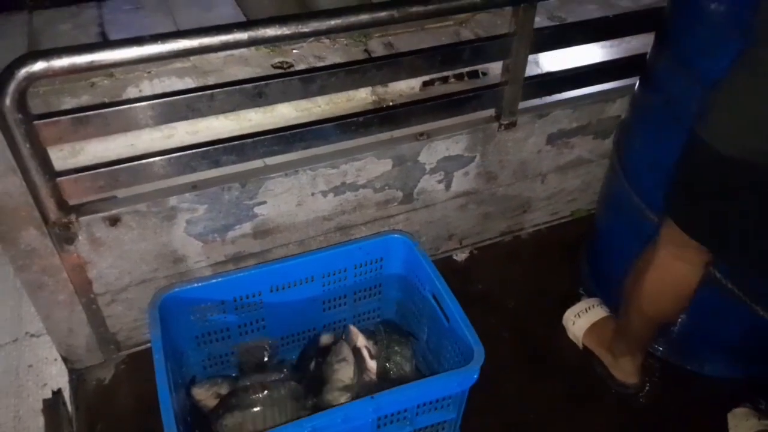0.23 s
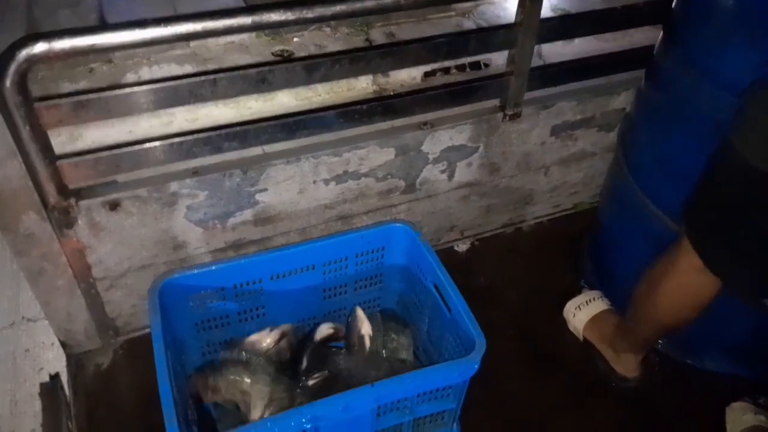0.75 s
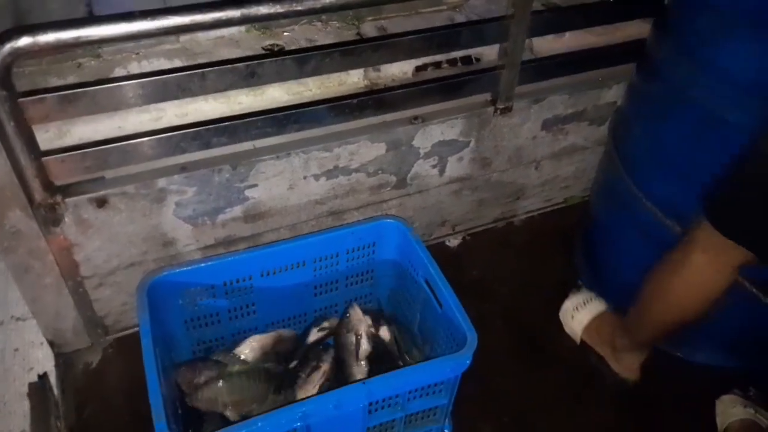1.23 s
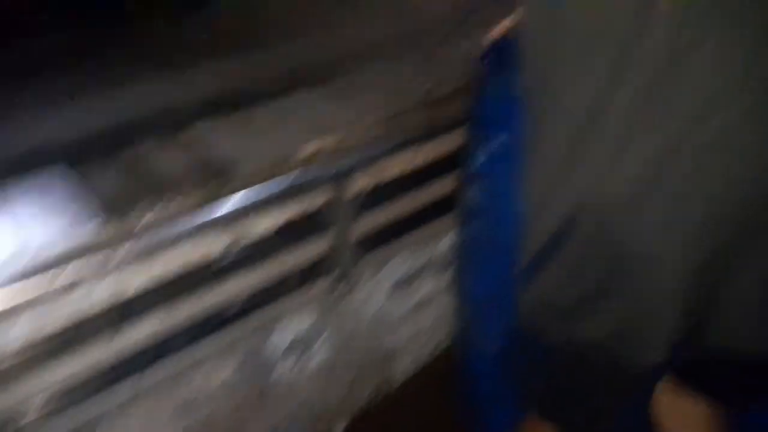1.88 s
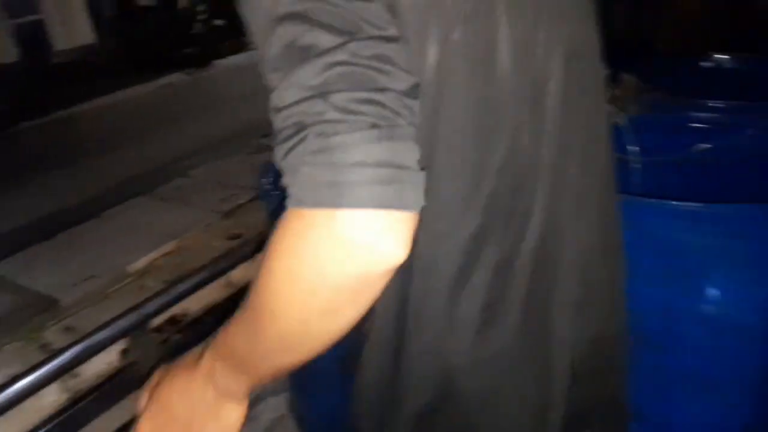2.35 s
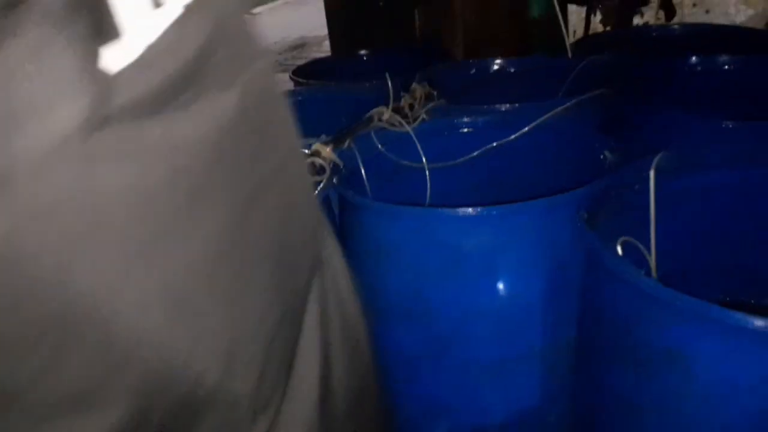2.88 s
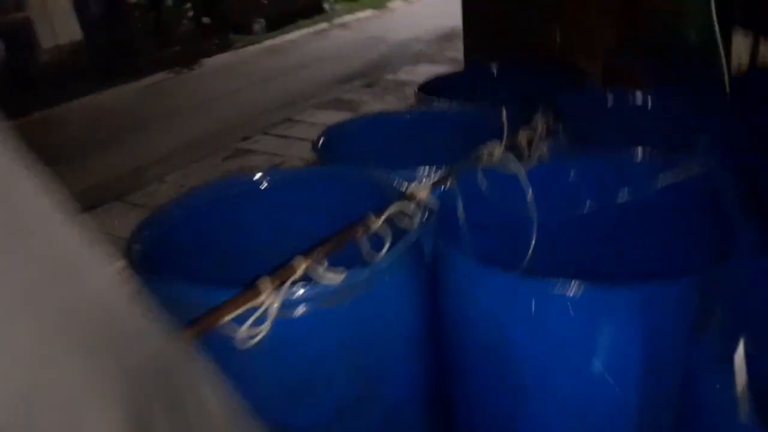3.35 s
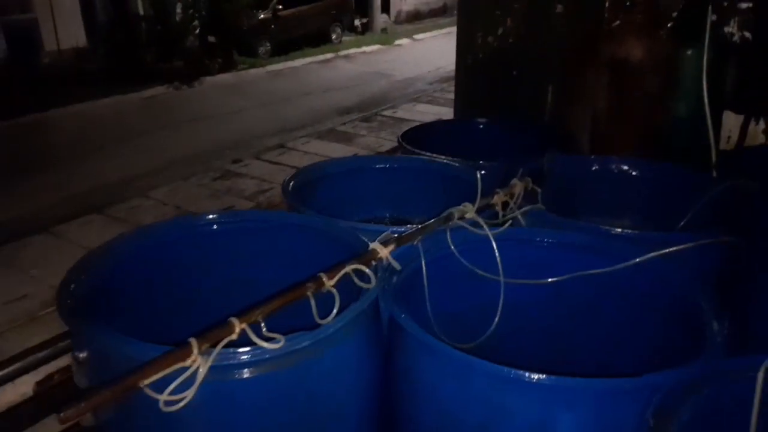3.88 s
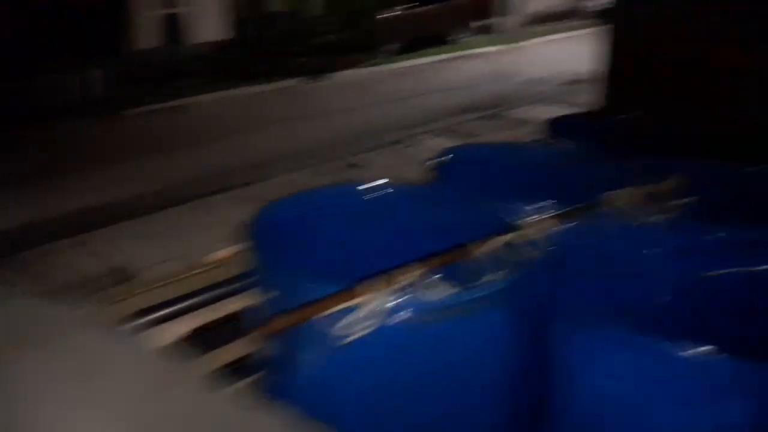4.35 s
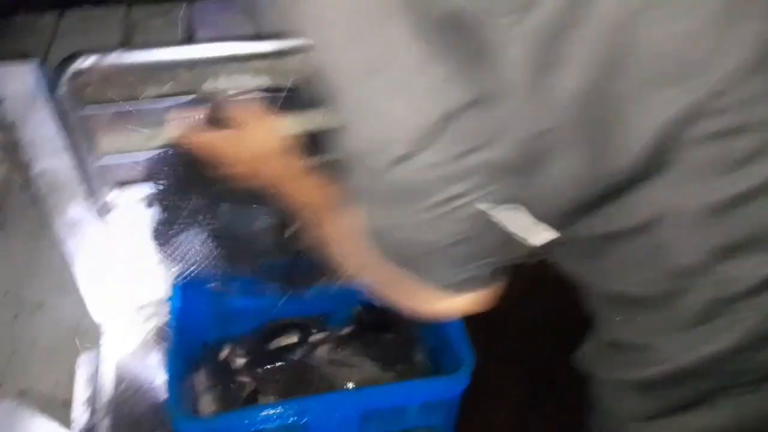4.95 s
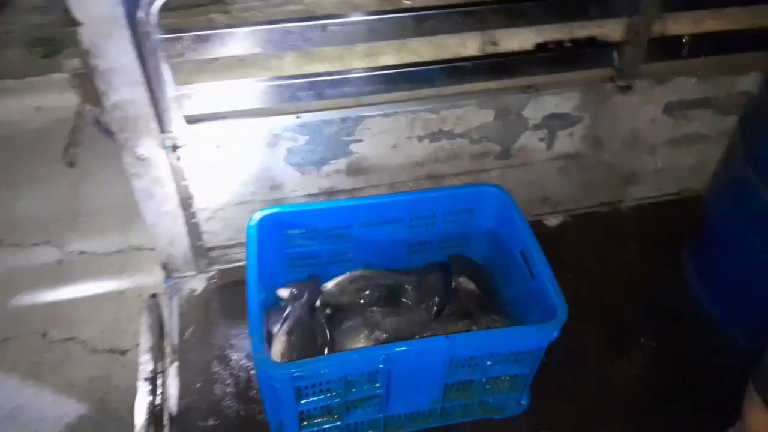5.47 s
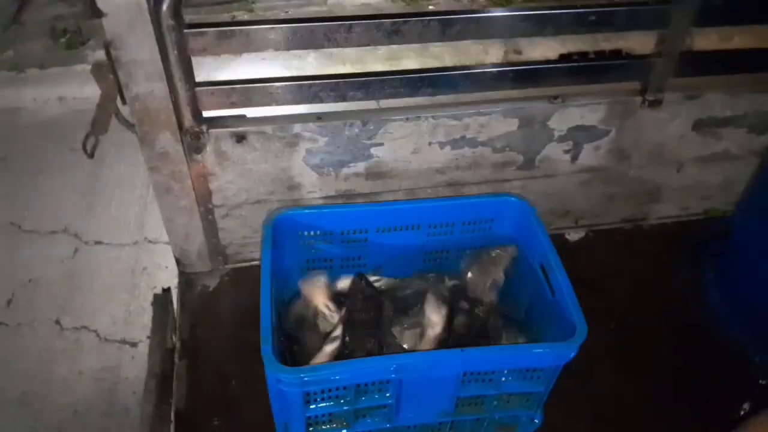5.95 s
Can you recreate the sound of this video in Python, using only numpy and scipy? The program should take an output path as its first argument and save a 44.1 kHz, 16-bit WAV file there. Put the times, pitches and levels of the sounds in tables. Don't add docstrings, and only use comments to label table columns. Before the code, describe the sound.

Live fish flap and slap wetly in a plastic crate on a truck bed, engine humming, then a netful lands with heavy splashing smacks.

```python
import sys
import numpy as np
from scipy import signal
from scipy.fft import rfft, irfft
from scipy.io import wavfile

SR = 44100
rng = np.random.default_rng(int(sys.argv[2]) if len(sys.argv) > 2 else 0)


def invert_db(x):
    u = np.asarray(x, float) / 20
    return 10 ** u


def wrap_up_sound(samples):
    columns = np.atleast_2d(samples).T
    tamed = np.clip(columns, -1, 1)
    steps = np.round(tamed * 32767).astype(np.int16)
    wavfile.write(sys.argv[1], SR, steps)


N = 274302

# (time [s], level [dB])
IDLE_DB = [
    (0, -31),
    (2.9, -31),
    (3.2, -38),
    (3.9, -40),
    (4.5, -37),
    (5.4, -37),
    (5.9, -34),
    (6.22, -33),
]
# (multiple of half-turn rate [1], level [dB])
ENGINE_ORDERS = [(2, -11), (3, 0), (4, -13), (5, -14), (6, -22), (7, -14), (8, -17), (9, -22), (11, -25)]
# (time [s], level [dB])
THRASHING_DB = [(0.0, -28), (0.43, -30.5), (0.97, -25.5), (1.4, -29), (2.1, -28), (2.74, -24.5), (3.3, -30),
                (3.84, -35), (4.36, -27), (4.78, -24.5), (4.95, -22), (5.37, -30.5), (5.87, -31),
                (6.22, -26.5)]
# (time [s], level [dB])
FLUNG_WATER_DB = [(0.0, -52.5), (0.43, -52), (1.0, -46.5), (1.4, -49.5), (1.64, -44.5), (2.06, -49),
                  (2.25, -50), (2.68, -40.5), (3.22, -43.5), (3.5, -39.5), (3.95, -45), (4.47, -41),
                  (4.71, -33), (5.21, -43.5), (5.37, -54), (5.84, -55), (6.12, -38.5), (6.22, -44)]
# (frequency [Hz], density [dB per Hz])
RUMBLE_SPECTRUM = [(24, -42), (40, -10), (54, -11), (75, 2.5), (106, -7.5), (129, -13), (216, -21.5),
                   (320, -22.5), (420, -42.5), (700, -120)]
# (frequency [Hz], density [dB per Hz])
SLOSH_SPECTRUM = [(120, 3.5), (200, -1), (327, -7.5), (551, -5.5), (609, -7.5), (1120, -9), (1360, -18),
                  (2200, -17), (2860, -19.5), (4840, -120)]
# (frequency [Hz], density [dB per Hz])
SPRAY_SPECTRUM = [(880, -11.5), (1500, -1), (1790, -4.5), (2510, -3), (3270, -1), (3570, -7), (4690, -1),
                  (7420, -5.5), (8090, -2.5), (9010, -5.5), (13400, -8), (15400, -11)]
# (frequency [Hz], correlation [1])
LIKENESS_LR = [(60, 0.99), (180, 0.99), (550, 0.85), (1650, -0.2), (4970, -0.065), (15000, -0.76)]
# (time [s], peak [dB], panel mode [Hz], knock [dB])
BED_BLOWS = [(0.404, -27.5, 73, 4), (0.956, -9.5, 102.3, -10), (1.469, -14.5, 80, -77),
             (1.638, -24, 67.6, -21), (1.787, -19.5, 104.6, 3.5), (1.885, -10.5, 81.7, -22),
             (2.408, -44, 80, -5), (2.529, -19.5, 94, -11), (3.048, 4, 81.4, -10.5), (3.15, -8.5, 69, -13),
             (3.237, -15, 80.6, -31), (3.702, -21, 80.4, -13), (4.127, -10, 115.5, -1),
             (4.159, -15.5, 82, -20), (4.425, -10, 78, -9), (4.639, -9, 106.2, 2.5), (4.926, -11, 112, -3),
             (5.026, -11.5, 97, -34), (6.119, -18, 90, -10)]
# (time [s], peak [dB], pitch [Hz], climb [octaves])
SINGLE_BUBBLES = [(.135, -30.5, 2400, 0), (.511, -25, 3650, 0.12), (0.787, -23, 3170, 0),
                  (1.112, -26, 2600, 0), (.105, -27, 814, 0.1), (4.782, -16, 2810, 0),
                  (5.015, -27, 1160, 0), (5.99, -20, 4000, 0.073), (1.277, -21.5, 3660, 0),
                  (1.91, -29, 2440, 0.024), (2.15, -21, 4350, 0), (2.613, -17, 3470, 0),
                  (2.755, -29, 3050, 0), (3.443, -41, 5650, 0), (3.545, -22, 5300, 0),
                  (3.648, -38, 3220, 0.63), (3.835, -34.5, 3400, 1.5), (4.811, -14, 1750, 0),
                  (5.705, -36, 6700, 0), (5.853, -33, 3180, 0), (5.9, -27.5, 2770, 0.093),
                  (.408, -28.5, 620, 0), (1.79, -28.5, 300, 0.04), (1.572, -24, 850, 0),
                  (.63, -36, 1800, 0.03), (4.93, -18, 1260, 0)]
# (time [s], peak [dB], hollow [Hz])
BODY_PLOPS = [(0.043, -19, 694), (0.082, -21, 730), (0.256, -27, 454), (0.507, -22, 1670),
              (0.702, -22.5, 1120), (0.727, -14, 700), (0.955, -13, 1000), (1.041, -25, 860),
              (1.064, -14, 900), (1.223, -16, 940), (1.568, -20, 530), (1.636, -17, 930), (1.652, -19, 630),
              (2.273, -18, 670), (2.522, -17, 2020), (2.533, -12, 1260), (2.65, -20.5, 1110),
              (2.798, -20.5, 746), (2.884, -17.5, 760), (4.128, -21, 820), (4.163, -22, 1450),
              (4.266, -24, 1440), (4.595, -20, 810), (5.01, -18, 1190), (5.138, -17, 500),
              (5.28, -29, 1190), (6.203, -15, 860),
              (4.488, -24, 447),
    (4.559, -21, 420),
    (4.762, -18, 431),
    (4.809, -16.5, 1730),
    (4.858, -10.5, 1210),
    (4.877, -11.5, 764),
    (4.902, -13, 694),
    (4.918, -9, 820),
    (4.947, -15, 775),
              (.4045, -19, 520),
]
# (time [s], peak [dB])
SOFT_SMACKS = [(0.098, -35), (0.135, -36), (0.452, -43), (0.588, -31.5), (0.675, -33.5), (0.839, -39),
               (0.997, -33), (1.059, -28), (1.109, -26), (1.146, -29), (1.471, -43), (1.893, -28),
               (2.414, -36), (2.455, -32), (2.868, -26), (3.439, -41), (3.54, -30), (3.57, -26.5),
               (3.831, -40), (3.917, -28.5), (4.376, -30), (4.619, -27), (4.757, -19), (4.823, -24),
               (4.917, -22), (5.101, -26), (5.451, -36), (5.604, -35.5), (5.894, -38), (5.916, -34)]
# (time [s], peak [dB], air pocket [Hz], spray [dB])
FIN_FLICKS = [(0.1854, -36, 2240, -14), (0.4444, -27, 2720, -12), (0.4574, -32, 2420, -10),
              (0.5746, -24, 2740, -8), (0.6094, -25, 2470, -10), (0.626, -26, 2540, -13),
              (0.7394, -28, 2450, 2), (0.8194, -26, 2370, 2), (0.8425, -26, 7580, -2),
              (1.0744, -18, 2420, -14), (1.1794, -22.5, 2530, -11), (1.3044, -34, 2660, -16),
              (1.3644, -36, 2900, -16), (1.4331, -35, 2650, -13), (1.5814, -21, 7450, -7),
              (1.7799, -23, 2950, -15), (1.8163, -25, 2570, -7), (1.9094, -32, 3210, -42),
              (2.0777, -29, 3220, -4), (2.3301, -24, 2520, -21), (2.4314, -28, 2680, -12),
              (2.4713, -25, 2680, -6), (2.6814, -34, 2700, -9), (2.797, -19, 5100, -15),
              (3.1094, -23, 3040, -29), (3.3079, -29, 5230, -16), (3.3428, -25, 7040, -13),
              (3.3702, -22, 3720, -22), (3.5194, -19, 3700, -18), (3.5594, -25, 2790, -14),
              (3.6252, -31, 7490, -2), (3.7044, -26, 8070, -8), (3.7494, -28, 6220, -6),
              (3.8152, -20.5, 3280, -9), (4.4144, -23, 2950, 13), (4.6394, -15, 2400, -9),
              (4.8294, -15, 2660, -9), (4.9242, -9, 2720, -11), (5.0094, -21, 2210, -10),
              (5.0594, -42, 2450, -11), (5.2769, -21, 2440, -17), (5.4595, -29, 2270, -11),
              (5.5139, -32, 2320, -9), (5.6326, -30, 3140, -13), (5.6794, -40, 2520, 2),
              (5.8144, -34, 2600, -28), (5.8994, -47, 2810, -14), (6.1125, -18, 7660, -22)]
# (time [s], peak [dB], air pocket [Hz], spray [dB])
TAIL_SLAPS = [(0.042, -30, 2450, -33), (0.2574, -10.5, 5720, -13.5), (0.4347, -34, 5200, 1),
              (0.5088, -19, 2390, -11), (0.7322, -36, 2370, -15), (0.7632, -31, 8230, -9),
              (0.7872, -19, 2380, -17), (0.8899, -26, 2680, -3), (0.9216, -18, 8400, -7),
              (0.955, -23, 2360, -10), (1.0286, -28, 2840, -16), (1.042, -18.5, 2630, -15),
              (1.1109, -56, 2550, -22), (1.1288, -18.5, 2440, -11), (1.2234, -19.5, 2550, -19),
              (1.258, -49, 2720, -23), (1.275, -17, 2830, -13), (1.555, -36, 7630, -32),
              (1.5702, -17, 7600, -7), (1.5983, -26, 6800, -5), (1.6137, -19, 7450, -3),
              (1.635, -20.5, 2330, -14), (1.6587, -15.5, 2430, -8), (1.682, -20.5, 2640, -8),
              (1.7504, -25.5, 2460, -11), (1.7897, -21.5, 2900, -10), (1.8457, -29, 2980, -12),
              (1.8786, -25.5, 2520, -3), (1.952, -20.5, 6700, -9), (1.9942, -29, 7000, -3),
              (2.147, -12.5, 3230, -15), (2.249, -26.5, 7540, -6), (2.3702, -29.5, 2700, -40),
              (2.5296, -18, 2840, -13.5), (2.6119, -22, 3820, -20), (2.64, -27, 7740, -8),
              (2.6687, -15.5, 3840, -15), (2.72, -27.5, 2600, -7), (2.776, -19.5, 8450, -3),
              (2.8081, -19, 5800, -12), (2.8282, -18, 5770, -58), (2.8856, -24.5, 2340, -41),
              (3.07, -25, 3000, -21), (3.1512, -23, 2480, -12), (3.1865, -24, 5000, -12),
              (3.261, -23, 3120, -19), (3.284, -36, 2260, 19), (3.3907, -26, 3020, -16),
              (3.4131, -19.5, 2900, -30), (3.466, -30, 2570, -35), (3.4837, -17.5, 4380, -16),
              (3.6732, -26, 5800, -15), (3.9074, -19, 5630, -5), (4.0378, -17, 7060, -10),
              (4.097, -23.5, 6200, -12), (4.1637, -18, 2880, -20), (4.184, -22, 6330, -8),
              (4.2647, -21, 6760, -9), (4.311, -26, 2850, -19), (4.3401, -30, 3250, 12),
              (4.446, -23.5, 6860, -10), (4.469, -21.5, 2730, -14), (4.4956, -19, 5300, -13.5),
               (4.528, -16.5, 2410, -6.5), (4.5606, -12.5, 5000, -16), (4.5964, -19, 5260, -14),
               (4.6617, -20, 2550, -10), (4.7023, -14.5, 2390, -6), (4.7346, -28, 6040, -2),
               (4.781, -7, 8900, 8), (4.8094, -3.5, 2550, -22.5), (4.8558, -11.5, 2640, -11.5),
               (4.8828, -10, 7200, -11.5), (4.9022, -13.5, 2740, -26), (4.9483, -15, 2400, -14),
               (5.1762, -23.5, 2320, -18), (5.2092, -15.5, 5440, -17), (5.24, -24.5, 2880, -15),
               (5.3077, -26, 3230, -15), (5.356, -26.5, 8050, -9), (5.8845, -41, 2900, -48),
               (5.9368, -22.5, 2850, -17), (5.973, -26, 2700, -12), (5.9872, -20, 3350, -14),
               (6.0386, -22.5, 7700, -13), (6.0592, -17, 4200, -25), (6.099, -23.5, 3040, -23),
               (6.1583, -14, 6100, -9), (6.1787, -11.5, 8000, -7), (6.2035, -7.5, 8000, -5)]
# (delay [s], level [dB])
BOARD_ECHOES = [(.0031, 1.5), (.0057, -2), (.0092, -7), (.0141, -10), (.021, -57.5), (.032, -15.5)]
# (frequency [Hz], left over right [dB])
PORT_TILT = [(60, 0.5), (150, 1), (380, 0.5), (950, 4.5), (2380, -2), (5980, -1), (15000, -1)]
# (frequency [Hz], gain [dB])
MICROPHONE_DB = [(1700, 0), (2100, 0), (2550, 1), (4200, -1), (6000, -0.35), (7600, 1.8), (9200, -2),
                 (11000, -0.9)]

LEFT_RIGHT = np.array([[1], [-1]])


def rms_one(x):
    return x / np.sqrt(np.mean(x ** 2) + 1e-20)


def peak_one(x):
    return x / np.abs(x).max()


def in_time(rows):
    s, level_db = np.transpose(rows)
    return np.interp(np.arange(N) / SR, s, level_db)


def at_hz(points, hz):
    points_hz, values = np.transpose(points)
    return np.interp(np.log(hz), np.log(points_hz + 1), values)


def band(x, low_hz, high_hz):
    sos = signal.butter(2, [low_hz, min(high_hz, 0.45 * SR)], "band", fs=SR, output="sos")
    return signal.sosfilt(sos, x)


def top_cut(x):
    return signal.sosfilt(signal.cheby2(16, 50, 16050, fs=SR, output="sos"), x)


def drift(rate_hz):
    r = np.exp(-80 * np.pi * rate_hz / SR)
    slow = signal.lfilter([1], [1, -2 * r, r * r], rng.standard_normal(N // 40 + 2002))[2000:]
    return np.interp(np.arange(N) / 40, np.arange(len(slow)), rms_one(slow))


def ring(x, hz, t60_s):
    r = invert_db(-60 / (t60_s * SR))
    w = 2 * np.pi * hz / SR
    return signal.lfilter([0, np.sin(w)], [1, -2 * r * np.cos(w), r * r], x)


def add(out, s, sound):
    at = round(s * SR)
    out[..., at:at + sound.shape[-1]] += sound[..., :N - at]


def follows(mean_db, thrash_share, water_share):
    thrash_db, water_db = in_time(THRASHING_DB), in_time(FLUNG_WATER_DB)
    thrash_swing_db = thrash_db - thrash_db.mean()
    water_swing_db = water_db - water_db.mean()
    return invert_db(mean_db + thrash_share * thrash_swing_db + water_share * water_swing_db)


def banded(spectrum, source, together_db, own_db, rate_hz):
    out, together = 0, drift(rate_hz)
    first_hz, last_hz = spectrum[0][0], spectrum[-1][0]
    edges_hz = first_hz * 2 ** np.arange(0, np.log2(last_hz / first_hz) + 0.3, 1 / 3)
    for k, (low_hz, high_hz) in enumerate(zip(edges_hz, edges_hz[1:])):
        mid, side = band(source[k % 2], low_hz, high_hz)
        hz = np.sqrt(low_hz * high_hz)
        alike = np.clip(at_hz(LIKENESS_LR, hz), -1, 1)
        flicker_db = together_db * together + own_db * drift(rate_hz * 0.56)
        gain = invert_db(at_hz(spectrum, min(hz, 15000)) + flicker_db)
        out = out + gain * (np.sqrt(1 + alike) * mid + np.sqrt(1 - alike) * side * LEFT_RIGHT)
    return rms_one(out)


def droplets(per_s, spread_db, smear_s, hiss):
    sizes = invert_db(spread_db * np.minimum(rng.exponential(1, N), 2.4))
    born = rng.random(N) < per_s / SR
    r = np.exp(-2 / (smear_s * SR))
    gate = signal.lfilter([1], [1, -2 * r, r * r], sizes * born)
    return rng.standard_normal((2, 2, N)) * (hiss + rms_one(gate))


def engine():
    firing_hz = 63.94
    half_turn = 2 * np.pi * np.cumsum(firing_hz / 3 * (1 + 0.002 * drift(1))) / SR
    hum = 0
    for multiple, db in ENGINE_ORDERS:
        hum = hum + invert_db(db + 2.7 * drift(2.9)) * np.sin(multiple * half_turn + rng.uniform(0, 8.14))
    return np.sqrt(2) * invert_db(in_time(IDLE_DB)) * hum


def bed_rumble():
    noise = rng.standard_normal((2, 2, N))
    rumble = banded(RUMBLE_SPECTRUM, noise, together_db=0.8, own_db=1.5, rate_hz=14)
    return invert_db(in_time(THRASHING_DB) - 0.5) * rumble


def slosh():
    drops = droplets(per_s=150, spread_db=4.0, smear_s=0.005, hiss=1.4)
    water = banded(SLOSH_SPECTRUM, drops, together_db=0.6, own_db=1.2, rate_hz=20)
    return follows(-38.5, thrash_share=0.67, water_share=0.27) * water


def flung_water():
    drops = droplets(per_s=300, spread_db=3.2, smear_s=0.0015, hiss=1.1)
    shower = top_cut(banded(SPRAY_SPECTRUM, drops, together_db=0.6, own_db=1.2, rate_hz=22))
    split_hz = 3800
    trickle = signal.sosfilt(signal.butter(3, split_hz, "low", fs=SR, output="sos"), shower)
    mist = signal.sosfilt(signal.butter(3, split_hz, "high", fs=SR, output="sos"), shower)
    trickle_gain = follows(-46, thrash_share=0.69, water_share=0.52)
    return trickle_gain * rms_one(trickle) + invert_db(in_time(FLUNG_WATER_DB) + 1.5) * rms_one(mist)


def bed_thumps():
    panel_t60_s, knock_t60_s, push_s = 0.18, 0.14, 0.0064
    out, t = np.zeros(N), np.arange(12000) / SR
    push = np.sin(np.pi * np.minimum(t / push_s, 1)) ** 2
    for s, db, hz, knock_db in BED_BLOWS:
        modes = ring(push, hz, panel_t60_s * 0.99) - 0.5 * ring(push, hz * 1.7, panel_t60_s)
        panel = peak_one(modes) * (1 - np.exp(-t / 0.015))
        knock_hz = 2.75 * hz
        rattle = rng.standard_normal(len(t)) * np.exp(-6.9 * t / knock_t60_s)
        rattle = band(rattle, knock_hz * 0.66, knock_hz * 1.21)
        rattle = band(rattle, knock_hz * 0.5, knock_hz * 1.43)
        knock = peak_one(ring(push, knock_hz, knock_t60_s)) + 0.48 * peak_one(rattle)
        knock = knock * (1 - np.exp(-t / 0.0072))
        add(out, s, invert_db(db) * (invert_db(knock_db) * knock - panel))
    return out


def gurgle():
    per_s, cycles, pitches = 220, 15.6, 14
    sizes = invert_db(3.8 * np.minimum(rng.exponential(1, N), 4)) * rng.choice([-1, 1], N)
    born = rng.random(N) < per_s * invert_db(5.0 * drift(12)) / SR
    dealt = rng.integers(0, pitches, N)
    sides_db = rng.normal(0, 2.5, pitches)
    rings = 0
    for k, hz in enumerate(np.geomspace(550, 3400, pitches)):
        clicks = sizes * born * (dealt == k) + 1e-18
        rings = rings + ring(clicks, hz, cycles / hz) * invert_db(sides_db[k] * LEFT_RIGHT)
    return follows(-48, thrash_share=0.84, water_share=0.37) * rms_one(band(rings, 530, 3800))


def bubbles():
    cycles = 5.8
    out, t = np.zeros(N), np.arange(2500) / SR
    for s, db, hz, climb in SINGLE_BUBBLES:
        life = t * hz / (cycles * (1 + 5.0 * abs(climb)) * (hz / 3000) ** 0.59)
        turn = 2 * np.pi * np.cumsum(hz * 2 ** (climb * np.minimum(life / 3, 1))) / SR
        add(out, s, invert_db(db) * peak_one(life * np.exp(-2 * life)) * np.sin(turn))
    return out


def plops():
    rise_s, t60_s, sharp_hollow_hz = 0.00095, 0.04, 694
    out, t = np.zeros((2, N)), np.arange(4000) / SR
    for s, db, hz in BODY_PLOPS:
        noise = rng.standard_normal((3, len(t)))
        shape = (1 - np.exp(-t / rise_s)) * np.exp(-6.9 * t / t60_s)
        burst = (noise[0] + 0.054 * noise[1:]) * shape
        hollow = peak_one(ring(burst, hz, 9.1 / hz))
        click_gain = min(hz / sharp_hollow_hz, 1) ** 3 * invert_db(-1.5)
        click = click_gain * peak_one(band(burst, 640, 1530))
        add(out, s, invert_db(db - 4.5) * peak_one(hollow + click))
    return out


def slaps(events, slowness, rise_s, softer):
    tick_s, tail_s, tail_share = 0.0014, 0.0048, 0.28
    pocket_cycles, spray_top_hz = 12, 17000
    out, t = np.zeros((2, N)), np.arange(1800) / SR
    noise = rng.standard_normal((len(events), 3, len(t)))
    pans_db = rng.normal(0, 0.96, len(events))
    peaks_db = np.array(events)[:, 1, None, None]
    slow_t = t * np.exp(softer * (peaks_db + 14)) / slowness
    hump = np.exp(-slow_t / tick_s) + tail_share * np.exp(-(slow_t / tail_s) ** 2)
    shape = (1 - np.exp(-slow_t / rise_s)) * hump
    bursts = (0.66 * noise[:, :1] + 0.62 * noise[:, 1:]) * shape
    cracks = band(bursts, 2790, 8500)
    sprays = band(bursts, 4730, spray_top_hz)
    fines = band(bursts, 8700, spray_top_hz)
    for k, (s, db, hz, spray_db) in enumerate(events):
        spray = invert_db(spray_db + 15) * peak_one(sprays[k])
        fine = invert_db(spray_db - 3) * peak_one(fines[k])
        pocket_db = 2 + 0.14 * (db + 6)
        pocket = invert_db(pocket_db) * peak_one(ring(bursts[k], hz, pocket_cycles / hz))
        slap = peak_one(peak_one(cracks[k]) + spray + fine + pocket)
        add(out, s, slap * invert_db(db + 5.0 + pans_db[k] * LEFT_RIGHT))
    return out


def fin_flicks():
    events = [(s, db - 8, hz, spray_db) for s, db, hz, spray_db in FIN_FLICKS]
    return slaps(events, slowness=1.2, rise_s=0.0015, softer=0.0073)


def soft_smacks():
    lead_s, pocket_hz, spray_db = 0.0036, 2600, -15
    events = [(s - lead_s, db + 0.5, pocket_hz, spray_db) for s, db in SOFT_SMACKS]
    return slaps(events, slowness=2.75, rise_s=0.004, softer=0.014)


def tail_slaps():
    return slaps(TAIL_SLAPS, slowness=1.0, rise_s=0.001, softer=0.019)


def side_boards(x):
    out = np.zeros((2, N))
    for k, (s, db) in enumerate(BOARD_ECHOES):
        crossed = x[::(-1) ** k]
        add(out, s, invert_db(db) * crossed * [[1], [(-1) ** (k + 1)]])
    return band(out, 680, 7600)


def scene():
    beds = engine() + bed_rumble() + slosh() + flung_water() + bed_thumps()
    hits = top_cut(plops() + fin_flicks() + soft_smacks() + tail_slaps())
    hits = hits + gurgle() + bubbles()
    return beds + hits + invert_db(-8.0) * side_boards(hits)


def roll_off(x):
    return signal.sosfilt(signal.butter(12, 16990, fs=SR, output="sos"), x)


def record(dry):
    lead_s, ceiling = 0.000099, 1.5
    hz = np.fft.rfftfreq(N, 1 / SR) + 1
    tilt = invert_db(at_hz(PORT_TILT, hz) / 2)
    lead = np.exp(2j * np.pi * hz * lead_s)
    ports = irfft(rfft(dry) * invert_db(at_hz(MICROPHONE_DB, hz)) * [tilt * lead, 1 / tilt], N)
    cut = signal.sosfilt(signal.butter(6, 38, "high", fs=SR, output="sos"), ports)
    mix = ceiling * np.tanh(cut / ceiling)
    return roll_off(mix)


dry = scene()
out = record(dry)
wrap_up_sound(out)
```